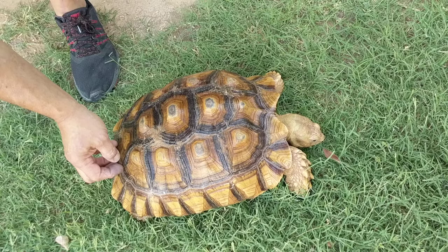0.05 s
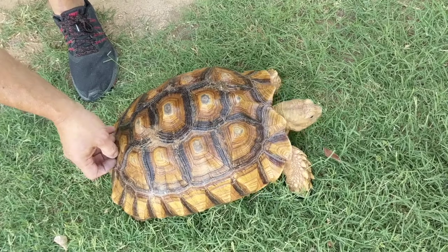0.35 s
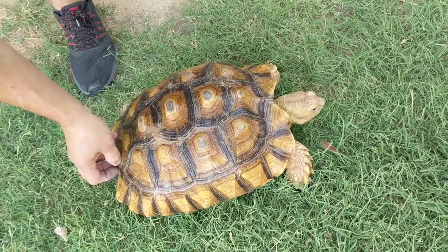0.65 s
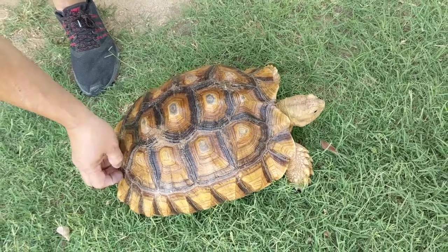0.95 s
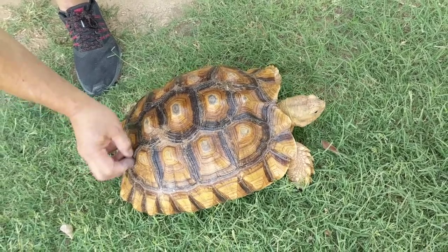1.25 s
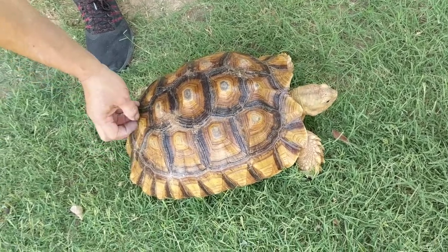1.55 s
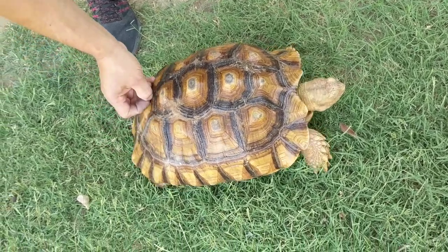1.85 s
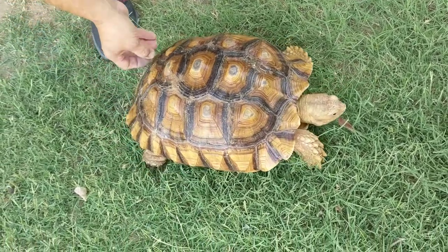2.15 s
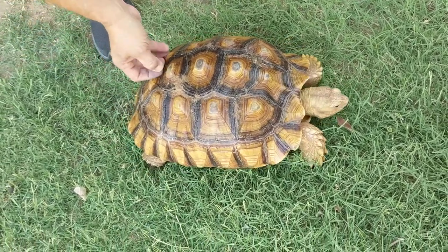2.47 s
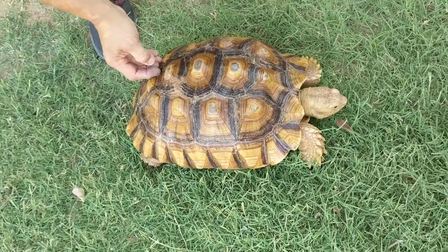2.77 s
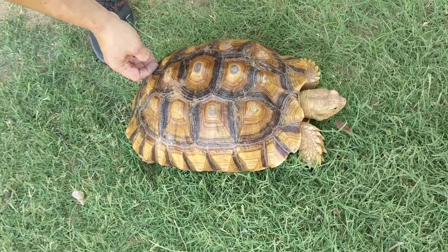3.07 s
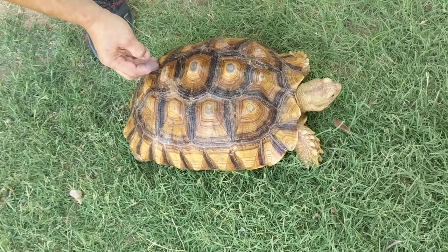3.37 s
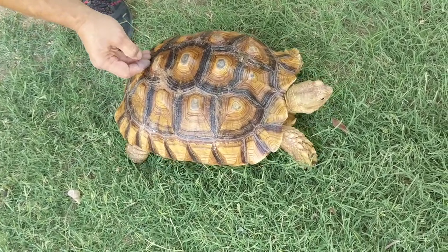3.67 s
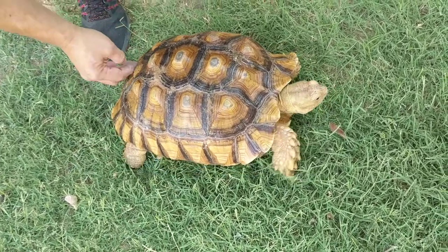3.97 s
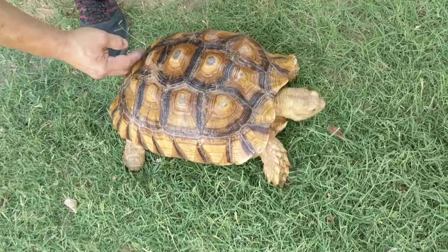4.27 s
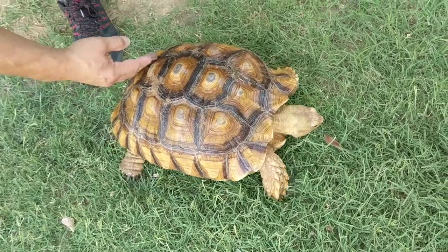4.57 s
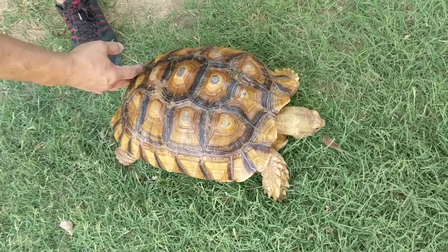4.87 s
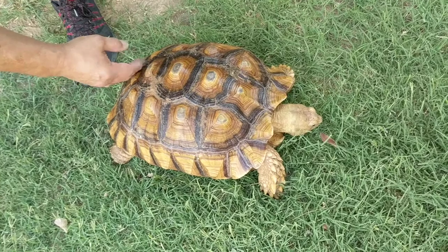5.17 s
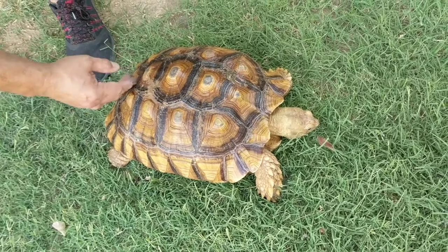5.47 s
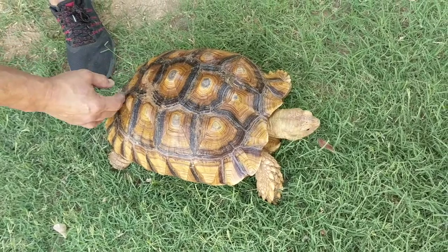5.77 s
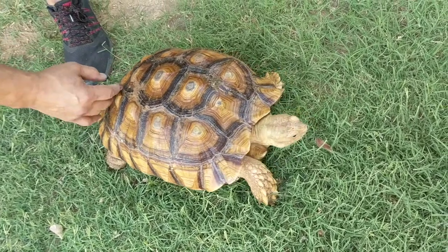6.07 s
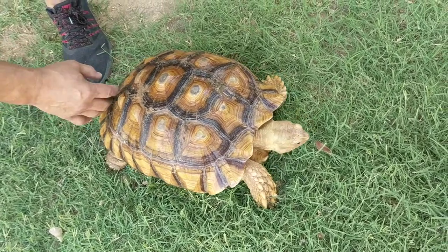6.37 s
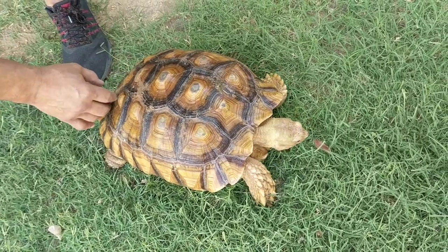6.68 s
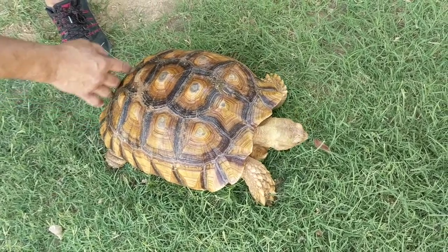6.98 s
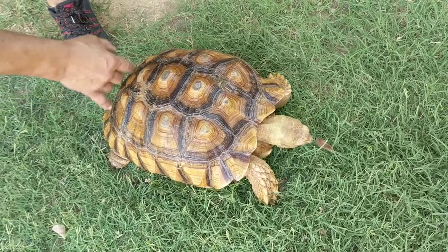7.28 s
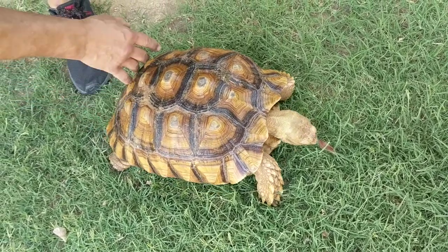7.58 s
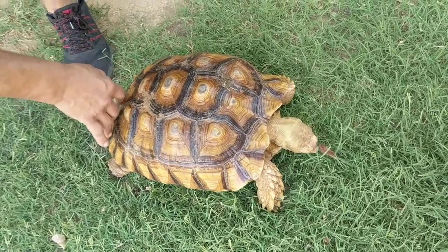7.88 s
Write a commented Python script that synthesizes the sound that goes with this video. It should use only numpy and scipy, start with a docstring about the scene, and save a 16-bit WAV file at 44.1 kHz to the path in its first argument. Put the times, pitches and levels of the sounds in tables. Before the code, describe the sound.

A faraway plane drones and drops in pitch as fingertips lightly scratch a hard shell, with nail ticks and faint rustling grass.

```python
"""A distant drone and a puff of wind come first; then fingertips scratch a tortoise's shell on a lawn.
The short dry strokes are stick-slip friction; nails click, bumps sound the hollow shell, and grass
rustles and snaps as the animal shifts. The drone, probably a light aircraft, falls in pitch by the
Doppler effect as it passes. Machinery hums far off and a bird buzzes twice."""
import sys
import numpy as np
from scipy import signal
from scipy.fft import rfft, irfft, next_fast_len
from scipy.io import wavfile
from scipy.ndimage import map_coordinates

SR = 44100
rng = np.random.default_rng(int(sys.argv[2]) if len(sys.argv) > 2 else 0)


def dump(signal):
    """Clip the signal to [-1, 1] and save it as 16-bit WAV at the path in sys.argv[1]."""
    limited = np.clip(np.atleast_2d(signal).T, -1, 1)
    pcm = np.round(limited * 32767).astype(np.int16)
    wavfile.write(sys.argv[1], SR, pcm)


N = 349713


def amp(db):
    """Decibels to amplitude ratio."""
    return 10 ** (np.asarray(db) / 20)


def unit(x):
    """Normalisation to rms 1."""
    return x / np.sqrt(np.mean(x ** 2) + 1e-20)


def clock():
    """Time of every sample in seconds."""
    return np.arange(N) / SR


def curve(rows):
    """Linear interpolation of (seconds, value) rows at every sample."""
    return np.interp(clock(), *np.transpose(rows))


def hump(s, half_length):
    """A Gaussian swell of height 1 around time s."""
    return np.exp(-np.minimum(((clock() - s) / half_length) ** 2, 80))


def wobble(rate):
    """Smooth random modulation, rate knots a second."""
    t = clock()
    coarse = map_coordinates(rng.standard_normal(4096), [t[::16] * rate], mode="wrap")
    return np.interp(t, t[::16], coarse)


def noise():
    """White noise of rms 1."""
    return rng.standard_normal(N)


def filtered(x, response):
    """Linear filtering: the spectrum of x times a frequency response."""
    size = next_fast_len(N + SR // 2)
    return irfft(rfft(x, size) * response(np.fft.rfftfreq(size, 1 / SR)), size)[:N]


def coloured(x, points):
    """Spectral shaping of x by (Hz, dB) points, at rms 1."""
    freqs, db = np.transpose(points)
    return unit(filtered(x, lambda hz: amp(np.interp(np.log(hz + 1), np.log(freqs), db, left=-80))))


def resonance(hz, centre, width):
    """Frequency response of a damped oscillator."""
    return 1j * hz * width / (centre ** 2 - hz ** 2 + 1j * hz * width)


def modes(rows):
    """Superposition of (Hz, width Hz, dB) modes with alternating signs."""
    return lambda hz: sum((-1) ** k * amp(db) * resonance(hz, centre, width)
                          for k, (centre, width, db) in enumerate(rows))


def grains(rate, spread_db, smooth):
    """Stick-slip friction: random impulses, rate a second, on a bed of smooth sliding noise."""
    slips = (rng.random(N) < rate / SR) * np.sign(noise())
    sizes = amp(spread_db * np.clip(noise(), -2, 2))
    return unit(unit(slips * sizes) + smooth * noise())


# Far machinery. Each row: frequency in Hz, level in dB.
HUM_PARTIALS = [(57, -68.5), (114, -63), (141.5, -63.5), (170, -70.5), (293, -79.5)]
# Faint hiss. Each row: frequency in Hz, relative density in dB.
HISS_SPECTRUM = [(500, 5.5), (2000, 5.5), (4000, 0), (5800, -3), (7200, -3.5), (10500, -10.5), (12500, -5),
                 (15500, -6)]

def machinery_and_hiss():
    """Tones over a noise floor: unsteady partials hum and a narrow band whines above an even hiss."""
    hum = sum(amp(db + 1.4 * wobble(3)) * np.sqrt(2) * np.sin(2 * np.pi * hz * clock() + 0.44 * wobble(2))
              for hz, db in HUM_PARTIALS)
    whine = amp(-80) * unit(filtered(noise(), lambda hz: resonance(hz, centre=1003, width=23)))
    return hum + whine + amp(-71) * coloured(noise(), HISS_SPECTRUM)


# Bird calls. Each row: start and length in seconds, lower band's centre in Hz and level in dB,
# upper band's centre in Hz and level in dB.
BIRD_BUZZES = [(5.625, 0.29, 4500, -82, 7600, -82.5), (7.178, 0.23, 3600, -76, 7650, -80)]
RELATIVE_BANDWIDTH, UPPER_LEAD_S = 0.12, 0.05

def bird():
    """Amplitude modulation makes a buzz: two narrow bands flutter together, rise fast and trail off."""
    out = np.zeros(N)
    for s, length, low_hz, low_db, high_hz, high_db in BIRD_BUZZES:
        flutter = amp(2.5 * np.tanh(wobble(70)))
        for start, centre, db in [(s, low_hz, low_db), (s - UPPER_LEAD_S, high_hz, high_db)]:
            progress = np.clip((clock() - start) / length, 0, 1)
            swell = np.sqrt(np.abs(np.sin(np.pi * np.sqrt(progress))))
            band = filtered(noise(), lambda hz: resonance(hz, centre, RELATIVE_BANDWIDTH * centre) ** 2)
            out += amp(db) * swell * flutter * unit(band)
    return out


# Wind buffet. Each row: frequency in Hz, relative density in dB.
WIND_SPECTRUM = [(22, -17), (45, 4), (70, -31), (115, 13), (170, -10), (300, -35), (800, -66)]
PUFF_S, PUFF_DB, PUFF_T60_S = 0.518, -43.5, 1.0

def wind_puff():
    """Turbulent pressure strikes the microphone at once and decays exponentially."""
    age = np.maximum(clock() - PUFF_S, 0)
    attack = 1 - np.exp(-age / 0.004)
    return amp(PUFF_DB - 60 * age / PUFF_T60_S) * attack * coloured(noise(), WIND_SPECTRUM)


# The aircraft's low and middle noise bands. Each row: frequency in Hz, relative density in dB.
RUMBLE_SPECTRUM = [(20, -46), (35, -9.5), (52, 3.5), (110, -1), (170, -3), (230, -11.5), (340, -17),
                   (500, -26.5), (1000, -74)]
RUSH_SPECTRUM = [(100, 13.5), (300, 0.5), (700, 2), (1050, 2.5), (1500, -2.5), (2100, -14), (3200, -21.5),
                 (6000, -40), (15000, -85)]
RUMBLE_DB, RUMBLE_SWELL_DB, RUSH_DB, RUSH_SWELL_DB = -58, 6, -63, 5

def aircraft_roar():
    """Broadband radiation: rumble, rush and smeared engine notes swell together on the approach."""
    approach = hump(1.92, half_length=2.28)
    fade_in = np.clip(clock() / PUFF_S, 0, 1) ** 4  # the rumble comes up with the wind
    rumble = fade_in * amp(RUMBLE_DB + RUMBLE_SWELL_DB * approach) * coloured(noise(), RUMBLE_SPECTRUM)
    rush = amp(RUSH_DB + RUSH_SWELL_DB * approach + 0.7 * wobble(12)) * coloured(noise(), RUSH_SPECTRUM)
    drone = unit(filtered(noise(), modes([(341, 10, -0.5), (505, 11.6, -6), (747, 113, -13.5)])))
    return rumble + rush + amp(-65.5) * approach * drone


# The engine's main tone, fading in and out through the air. Each row: time in seconds, level in dB.
MAIN_TONE_LEVEL = [(0.27, -59), (0.55, -46), (0.73, -52.5), (1.02, -41), (1.15, -50), (1.33, -42.5),
                   (1.44, -55.5), (1.91, -40.5), (2.04, -45.1), (2.11, -53.8), (2.39, -42.5), (3.15, -54.5),
                   (3.36, -46), (3.49, -63.5), (3.76, -49.5), (3.85, -56.1), (5.4, -62.5), (7.9, -73)]
# Other tones, each beamed down during part of the pass. Each row: multiple of the engine pitch,
# centre and half length in seconds, level in dB, beat period in seconds, beat depth in dB.
BEAMED_TONES = [(0.624, 0.95, 0.42, -53, 0.54, 3.5), (0.629, 2.38, 0.41, -53.5, 0.52, 1.5),
                (0.626, 5.88, .55, -53, .6, 2.5), (.625, 6.55, 0.48, -54, .41, 3.5),
                (1.375, 4.28, .33, -48.5, 0.23, -0.5), (1.374, 5.25, 0.21, -57, 0.16, 3),
                (2.001, 0.72, 0.23, -58, .49, 1), (2, 1.637, 0.77, -65, .49, 3.5),
                (2.002, 3.24, 0.13, -60.5, 0.43, -0.5)]
ENGINE_HZ, DOPPLER_HZ, PASS_S, FALL_S = 107.04, 20.97, 4.05, 1.4

def aircraft_tones():
    """Doppler effect: all tones sink together in the pass, each wavering in turbulent air."""
    t = clock()
    pitch_hz = ENGINE_HZ - DOPPLER_HZ * np.tanh((t - PASS_S) / FALL_S)
    phase = 2 * np.pi * np.cumsum(pitch_hz) / SR

    def tone(multiple, level_db):
        waver = 0.5 * multiple * wobble(9)  # higher tones are scattered more
        return amp(level_db + 1.6 * wobble(18)) * np.sqrt(2) * np.sin(multiple * phase + waver)

    beamed = np.zeros(N)
    for multiple, s, half, db, beat_s, beat_db in BEAMED_TONES:
        beat = beat_db * np.cos(2 * np.pi * (t - s) / beat_s)
        beamed += tone(multiple, db + beat) / (1 + ((t - s) / half) ** 2)
    return tone(0.99, curve(MAIN_TONE_LEVEL) + 0.16) + beamed


# A foot or the shell's rim pushes through grass. Each row: peak time and rise time in seconds,
# relative level in dB.
GRASS_PUSHES = [(0.544, 0.31, -79.5), (1.96, 0.1, -68.5), (2.305, 0.25, -73.5), (3.147, 0.012, -75),
                (3.863, 0.41, -72), (4.07, 0.061, -65.5), (4.384, 0.084, -69.5), (4.77, 0.058, -71.5),
                (6.102, 0.44, -81.5), (7.085, 0.025, -71.5), (7.488, 0.2, -74.5), (7.852, .033, -71)]
# Rubbing blades. Each row: frequency in Hz, relative density in dB.
BLADE_SPECTRUM = [(600, -41), (2000, 7.5), (4000, 6), (8000, 3.5), (10500, 2.5), (13000, 5.5), (15500, 3.5)]
SETTLE_RATIO = 1.59  # blades settle this much more slowly than they bend

def grass():
    """Sliding friction between blades gives a fine bright crackle; a few snap free."""
    power = sum(amp(db) ** 2 * hump(s, rise * np.where(clock() > s, SETTLE_RATIO, 1)) ** 2
                for s, rise, db in GRASS_PUSHES)
    sliding = coloured(grains(rate=1200, spread_db=1.5, smooth=1.3), BLADE_SPECTRUM)
    snaps = coloured(grains(rate=55, spread_db=19, smooth=0), BLADE_SPECTRUM)
    return amp(4) * np.sqrt(power) * (sliding + 0.22 * snaps)


# Fingertip bumps. Each row: start in seconds, relative level in dB, 60 dB decay time in seconds.
BUMPS = [(1.374, -52.5, 0.024), (2.202, -59, 0.041), (2.788, -56, .04), (5.598, -57.5, 0.054),
         (6.718, -62, 0.033), (7.367, -62, .025), (7.843, -53.5, 0.028)]
# The hollow shell. Each row: mode frequency in Hz, bandwidth in Hz, gain in dB.
SHELL_MODES = [(513, 460, 5.5), (1290, 360, 4.5), (1800, 450, 0.5), (2640, 2400, -5.5)]

def shell_knocks():
    """Forced vibration: soft contacts drive the heavily damped modes of the dome."""
    t = np.arange(SR // 10) / SR
    force = np.zeros(N + SR)
    for s, db, t60 in BUMPS:
        force[round(s * SR):][:len(t)] += amp(db + 13.5) * rng.standard_normal(len(t)) * amp(-60 * t / t60)
    return filtered(force, modes(SHELL_MODES))


# Sharp ticks: nails clicking on the shell and brighter snaps of grass.
# Each row: start in seconds, relative level in dB, ring frequency in Hz.
SHARP_TICKS = [(0.572, -48, 4520), (0.8673, -51, 3330), (0.9785, -49, 3790), (1.324, -51, 4050),
               (1.3765, -58, 2950), (1.584, -49, 3320), (2.2017, -49, 3040), (2.339, -41.5, 4600),
               (2.6127, -49.5, 3700), (2.944, -44, 4530), (3.134, -55, 4480), (4.5262, -49, 7860),
               (4.6332, -48, 7330), (4.721, -43, 8300), (4.7365, -41.5, 4200), (5.4088, -48, 7320),
               (5.9411, -52, 3300), (6.299, -50, 4200), (6.4987, -52, 3790), (6.8928, -47, 6440),
               (7.1674, -44.5, 7600), (7.3693, -44.5, 5570), (7.5373, -48, 6130), (7.7909, -49.5, 2800),
               (7.8446, -40, 8160)]
RING_CYCLES = 64  # the ring falls 60 dB in this many cycles

def sharp_ticks():
    """Impulse response: a nail or a snapping grass blade gives a broad click and a brief ring."""
    t = np.arange(SR // 40) / SR
    hz = np.fft.rfftfreq(len(t), 1 / SR)
    out = np.zeros(N + SR)
    for s, db, ring_hz in SHARP_TICKS:
        jitter, burst = rng.standard_normal((2, len(t)))
        phase = 2 * np.pi * ring_hz * t + 0.18 * np.cumsum(jitter)
        ring = np.sin(phase) * amp(-60 * t * ring_hz / RING_CYCLES)
        snap = burst * amp(-60 * t / 0.01)
        click = irfft(rfft(snap) * resonance(hz, ring_hz, width=1.5 * ring_hz), len(t))
        out[round(s * SR):][:len(t)] += amp(db) * (1.4 * click / np.linalg.norm(click) + 0.33 * ring)
    return out[:N]


def judder(rate, slip_s, depth):
    """Relaxation: each skip over a growth ring, rate a second, lifts the gain at once and dies fast."""
    skips = (rng.random(N) < rate / SR) * (1 + rng.random(N))
    bites = signal.lfilter([1], [1, -np.exp(-1 / (slip_s * SR))], skips)
    return unit(1 + depth * np.tanh(bites))


# Bouts of scratching. Each row: first and last stroke time in seconds, number of strokes,
# stroke length in seconds, relative levels of pull and return in dB.
SCRATCH_BOUTS = [(0.722, 0.865, 2, 0.062, -70, -80), (0.991, 1.482, 5, 0.047, -67, -74.5),
                 (1.607, 1.795, 3, 0.024, -74, -70.5), (2.196, 2.437, 3, 0.039, -66, -87),
                 (2.698, 3.387, 7, 0.059, -70, -73.5), (3.718, 3.845, 2, 0.039, -70, -70),
                 (4.513, 4.721, 3, 0.07, -68, -71), (4.861, 5.068, 3, 0.073, -70, -73.5),
                 (5.18, 5.604, 5, 0.061, -68, -70), (5.705, 5.938, 3, .065, -72, -71),
                 (6.033, 6.36, 4, 0.063, -69.5, -72.5), (6.46, 6.591, 2, 0.05, -70.5, -68),
                 (6.667, 6.784, 3, .021, -70, -67.5), (7.612, 7.783, 2, .06, -71, -72)]
RETURN_EARLY_S = 0.0049  # the finger springs back a little ahead of the beat

def stroke_envelope():
    """Incoherent sources add in power: alternating pulls and returns swell and fade with finger speed."""
    t = clock()
    power = np.zeros(N)
    for first, last, count, length, pull_db, return_db in SCRATCH_BOUTS:
        for k, beat_s in enumerate(np.linspace(first, last, round(count))):
            s, db = (beat_s - RETURN_EARLY_S, return_db) if k % 2 else (beat_s, pull_db)
            off_centre = np.minimum(np.abs(1.81 * (t - s) / length), 10)
            power += amp(db) ** 2 * np.exp(-off_centre ** 4.4)
    return np.sqrt(power)


# Curled fingers scratch with the nails, flat ones rub with the pads.
# Each row: time in seconds, the nails' share of the power from 0 to 1.
NAIL_POWER_SHARE = [(1.0, 0.5), (3.0, 0.46), (4.4, 0.02), (5.4, 0.32), (6.7, 0.2), (7.6, 0.2)]
# Friction on the shell. Each row: frequency in Hz, relative density in dB.
SCRAPE_SPECTRUM = [(400, -13), (1200, 2), (2200, 4), (3600, 0.5), (4800, -4), (6000, 0), (8000, -0.5),
                   (10500, -6.5), (13000, -1.5), (15500, -8.5)]
# The nail's edge. Each row: mode frequency in Hz, bandwidth in Hz, relative gain in dB.
NAIL_MODES = [(3720, 1400, 0.5), (5050, 860, 2), (6060, 1800, -6.5), (8000, 1800, -10.5)]

def scratching():
    """Stick-slip friction: pads rub broadly, nails resonate, and growth rings make both judder."""
    roughness = judder(rate=150, slip_s=0.0014, depth=1.64)
    share = np.clip(curve(NAIL_POWER_SHARE), 0, 1)
    pad = coloured(grains(rate=3000, spread_db=-1, smooth=0.77), SCRAPE_SPECTRUM)
    nail = unit(filtered(grains(rate=900, spread_db=1.5, smooth=0.76), modes(NAIL_MODES)))
    catches = coloured(grains(rate=130, spread_db=2, smooth=0), SCRAPE_SPECTRUM)
    friction = np.sqrt(share) * nail + np.sqrt(1 - share) * pad
    return amp(1.1) * stroke_envelope() * (roughness * friction + 0.45 * catches)


def scene():
    """Superposition in a free field: the sources add in open air, with no echo."""
    tortoise = scratching() + sharp_ticks() + shell_knocks() + grass()
    aircraft = aircraft_tones() + aircraft_roar()
    return (tortoise + aircraft + wind_puff() + machinery_and_hiss() + bird())[None]


OPEN_S, TOP_HZ = 0.244, 15750

def record(dry):
    """Gating and band limiting: the microphone opens after a moment and passes nothing above TOP_HZ."""
    gate = 1 - np.exp(-np.maximum(clock() - OPEN_S, 0) / 0.005)
    return filtered(dry[0] * gate, lambda hz: hz < TOP_HZ)[None]


dry = scene()
out = record(dry)
dump(out)
```